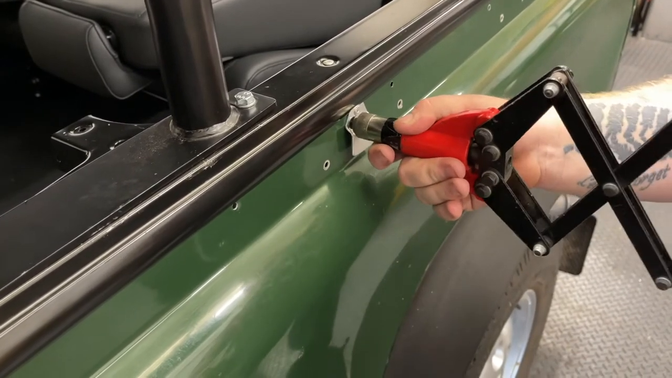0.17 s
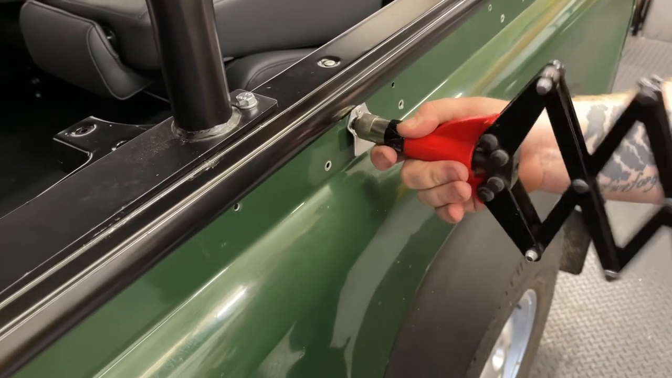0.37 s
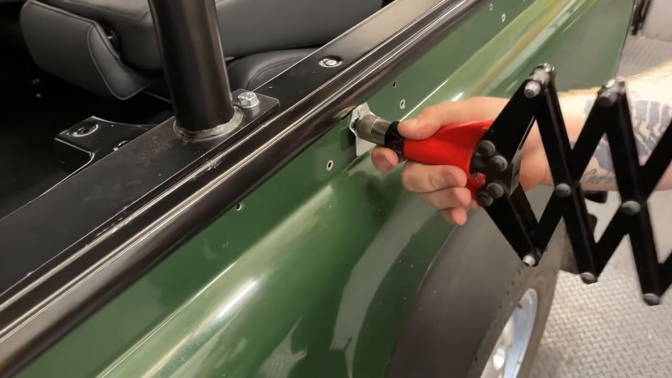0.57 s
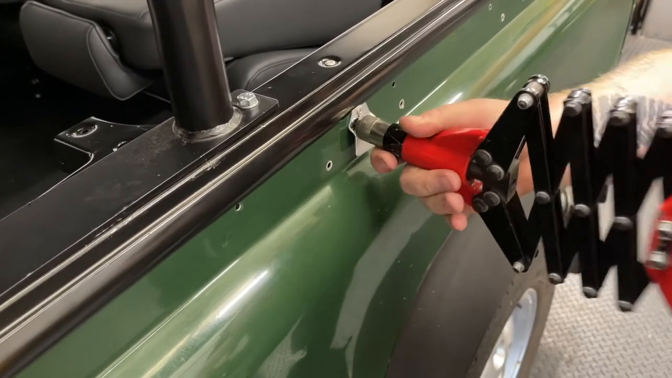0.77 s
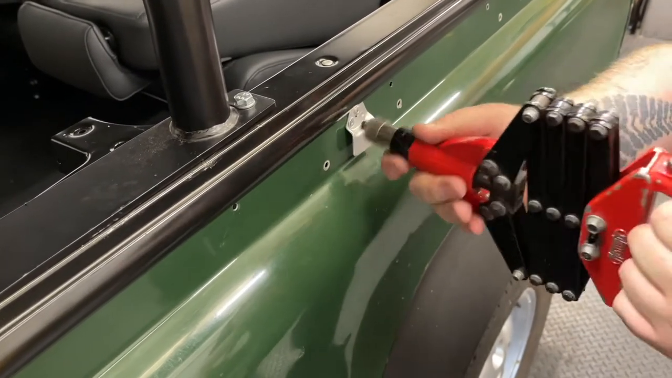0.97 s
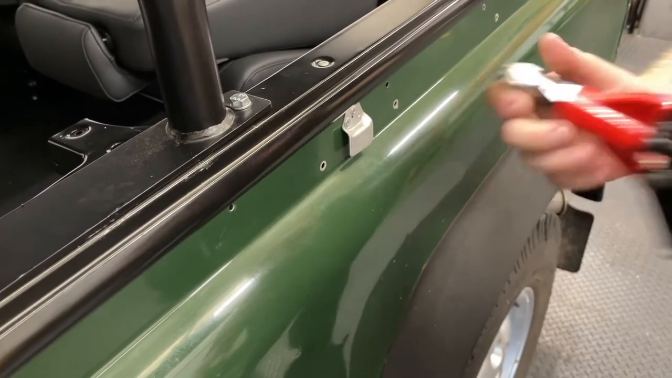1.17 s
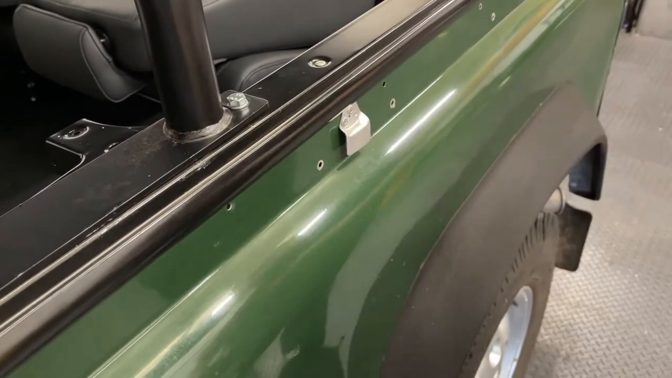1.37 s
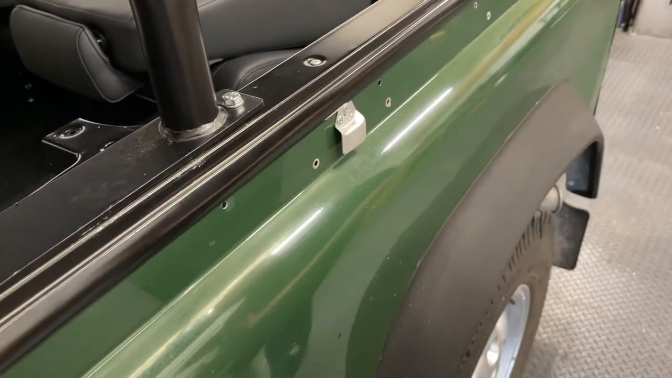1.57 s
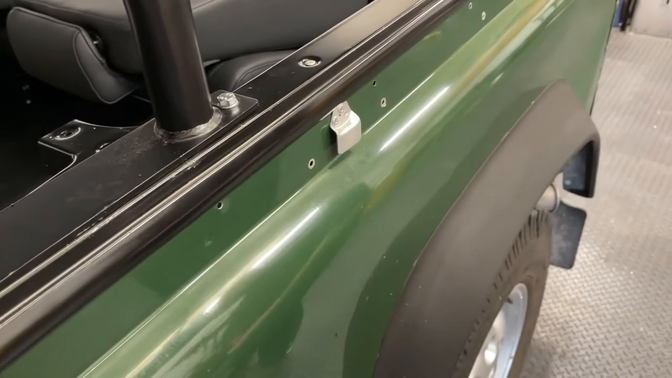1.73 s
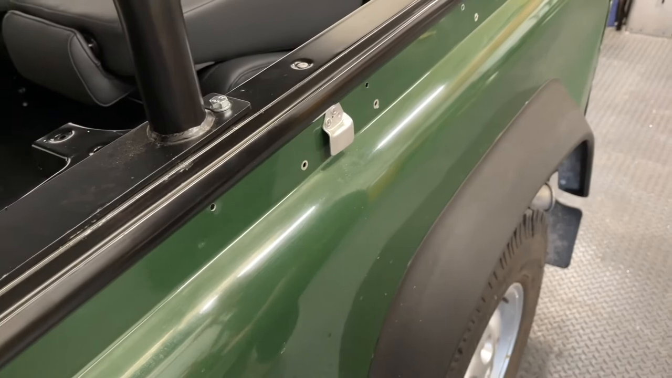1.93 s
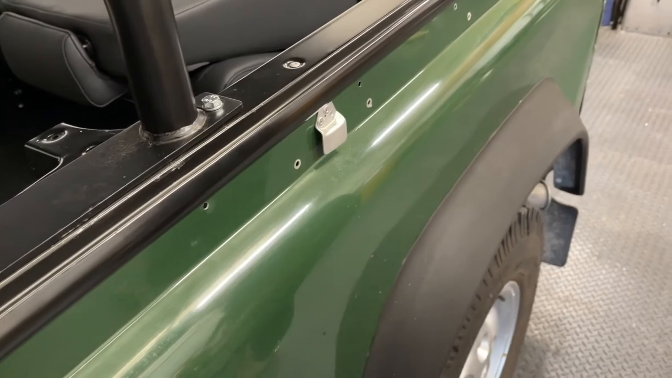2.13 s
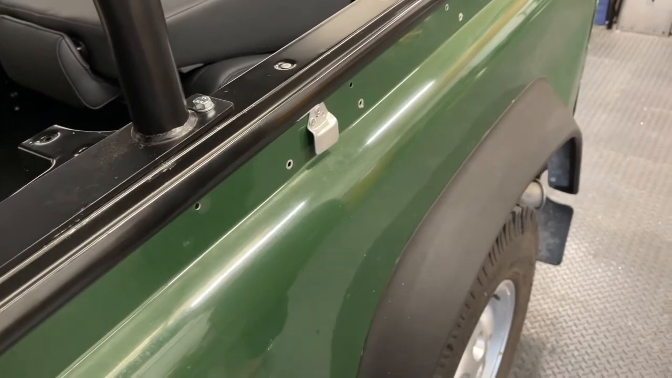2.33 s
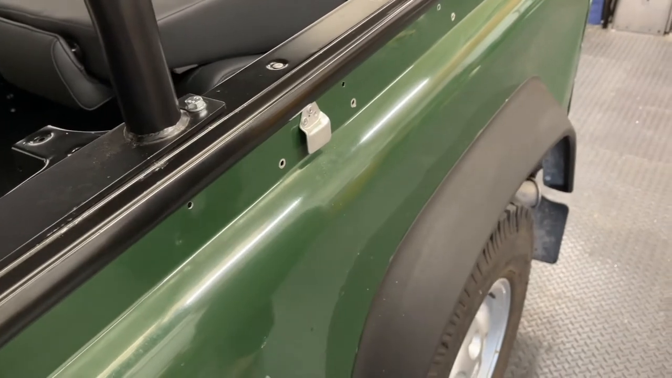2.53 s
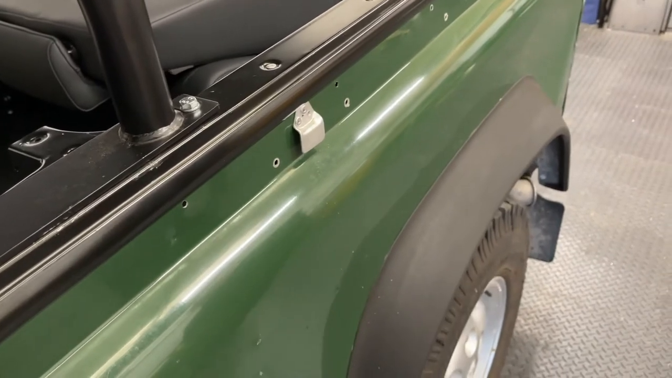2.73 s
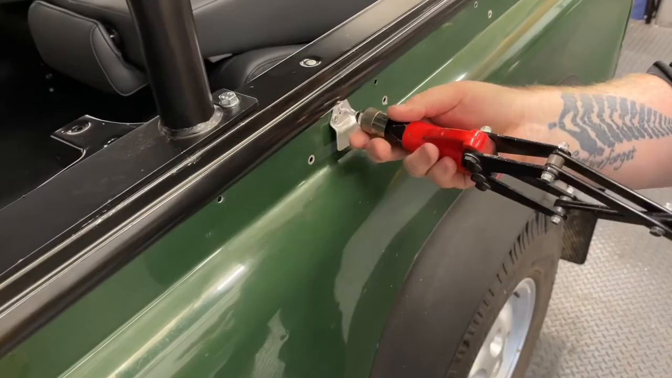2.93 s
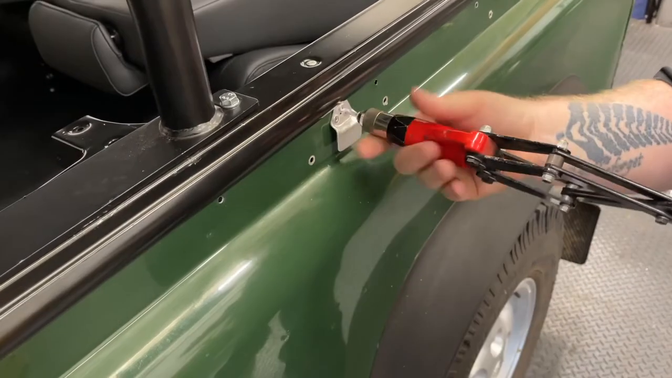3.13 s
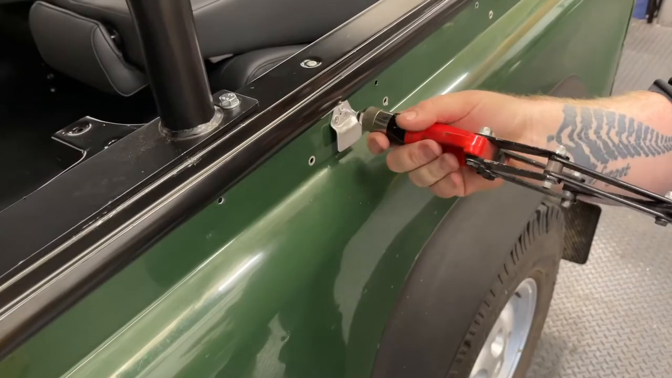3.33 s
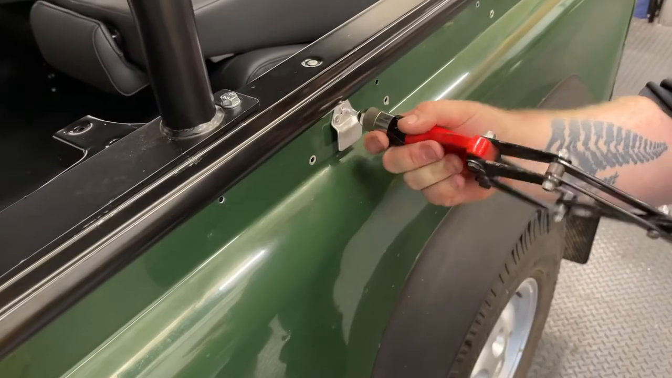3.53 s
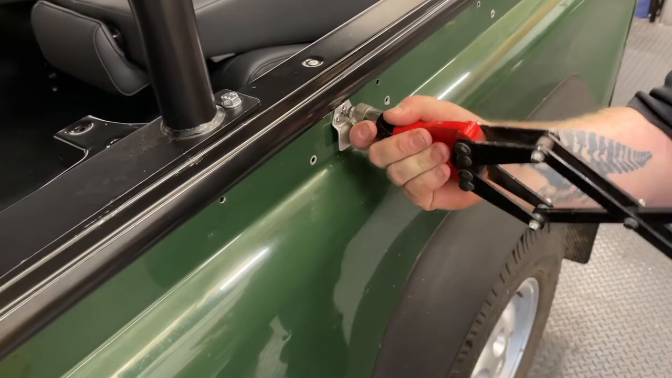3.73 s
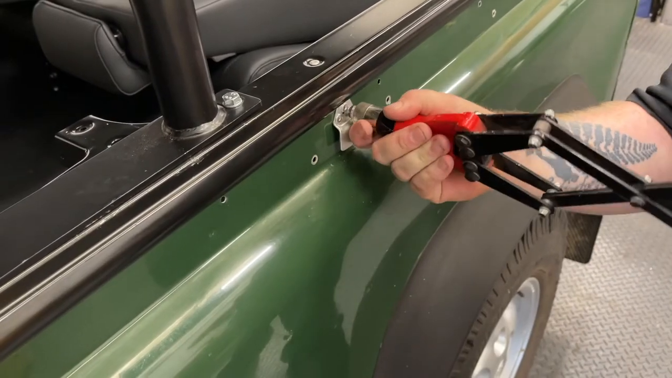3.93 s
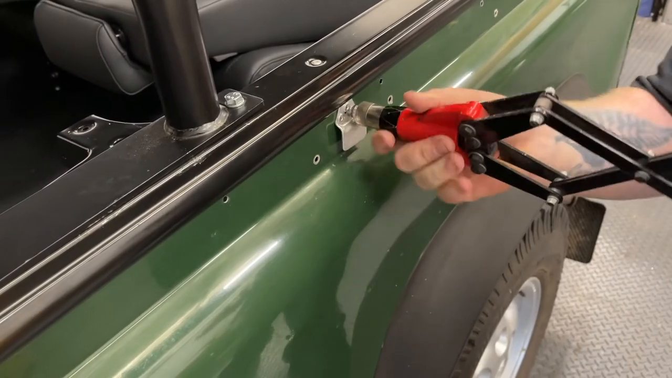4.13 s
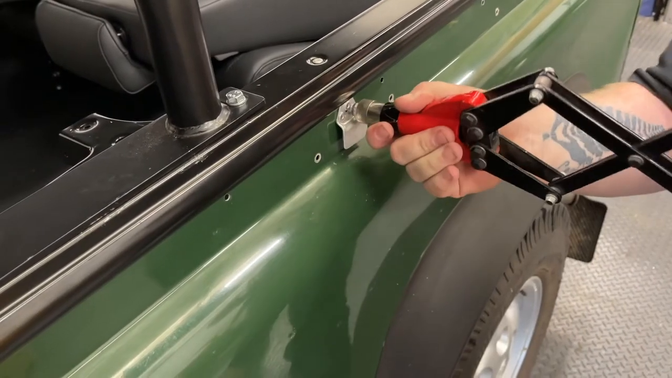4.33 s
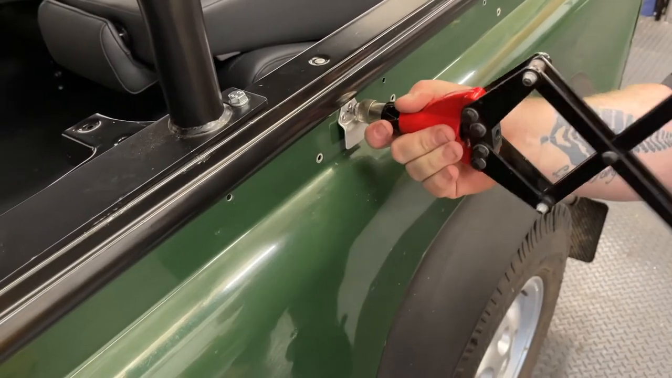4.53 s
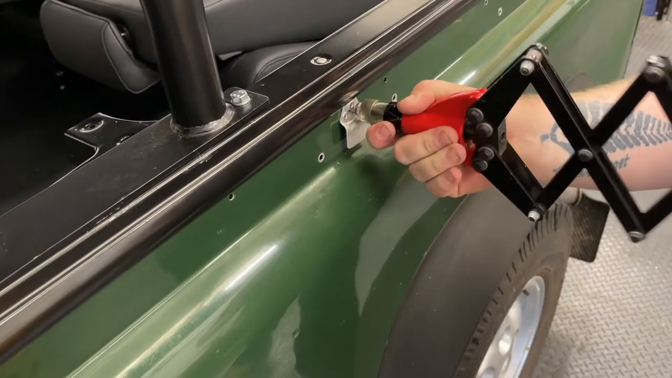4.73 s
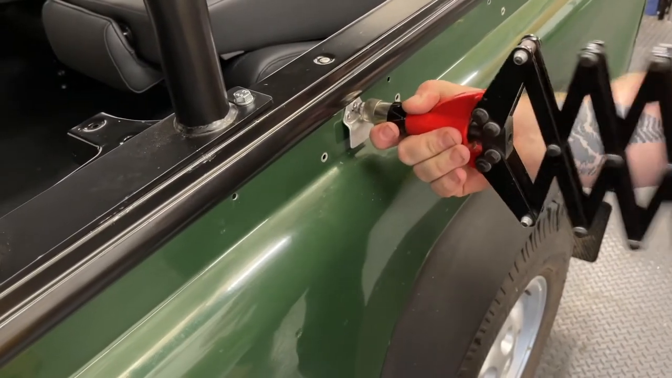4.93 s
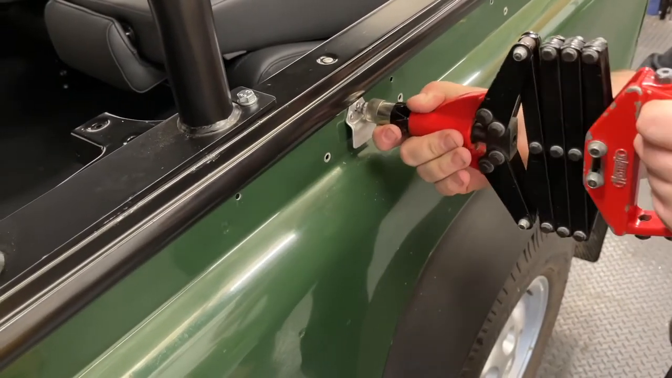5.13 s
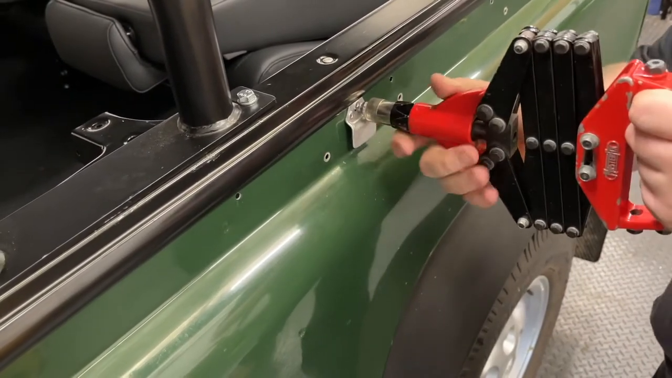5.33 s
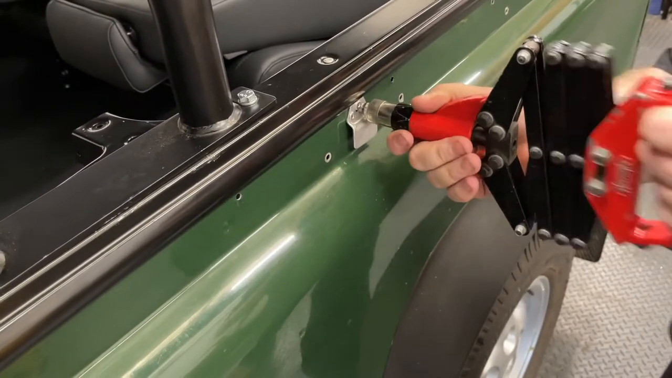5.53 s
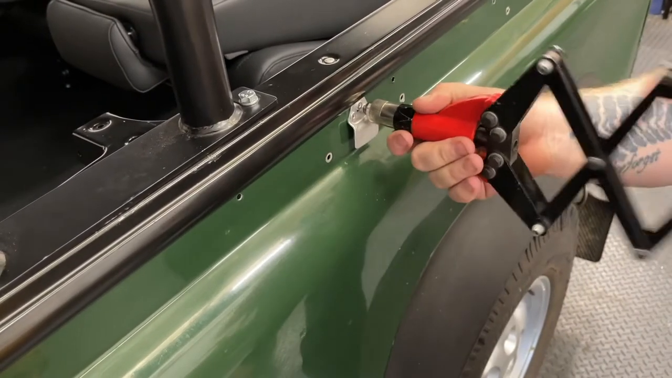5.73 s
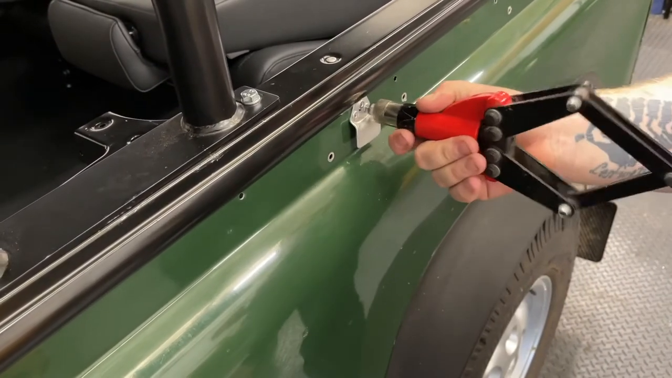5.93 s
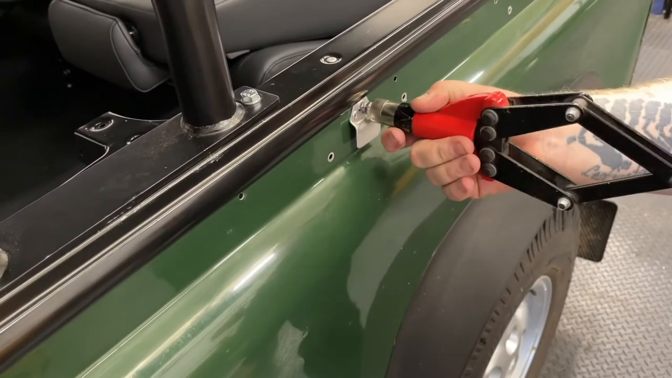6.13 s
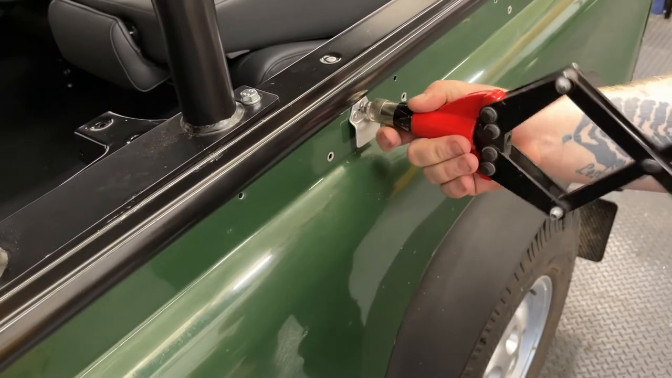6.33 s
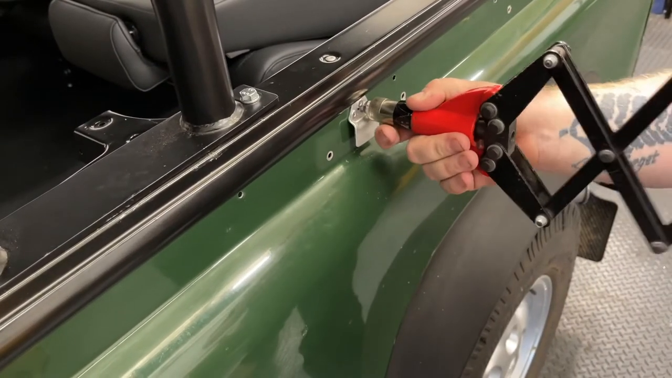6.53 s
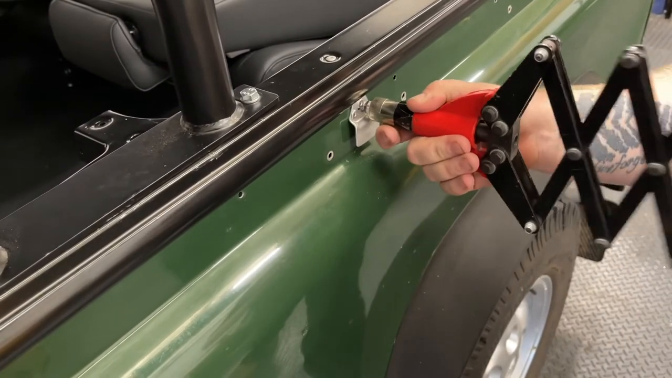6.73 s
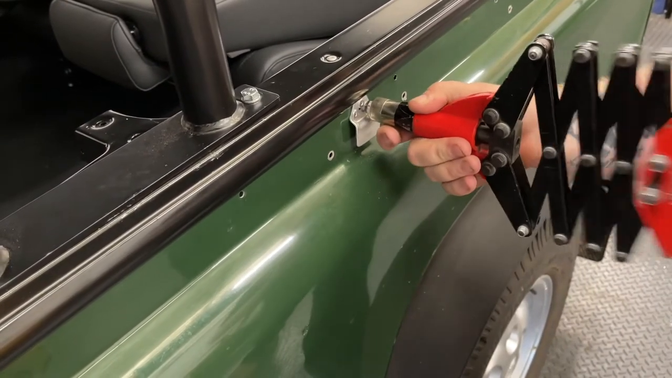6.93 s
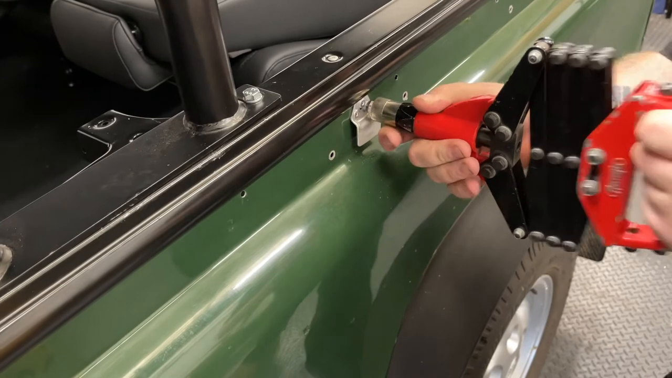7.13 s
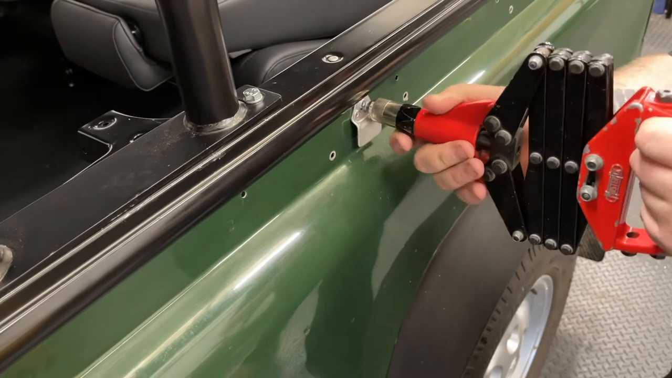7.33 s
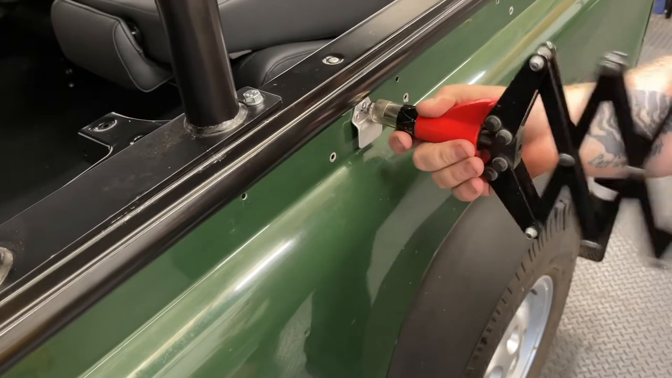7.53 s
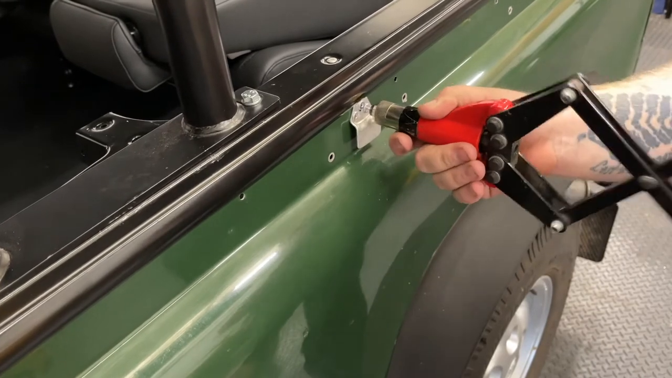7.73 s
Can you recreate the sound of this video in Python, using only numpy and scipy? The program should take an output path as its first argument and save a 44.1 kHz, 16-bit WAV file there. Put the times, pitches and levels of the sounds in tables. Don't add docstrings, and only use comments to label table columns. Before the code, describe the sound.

A low room hum with faint hiss runs throughout, in a hard workshop with short echoes. At 0.24 s a steel clack and low body boom strike with a scrape, then at 0.85 s a bright dry snap. From 1.1 to 2.8 s it is quiet: light ticks, dull bumps around 1.7 and 2.2 s, soft rubbing. A very brief dropout at 2.85 s leads to a low thump and small handling clicks. At 3.67 s comes the loudest slam, hard metal with a deep panel thud. Small ticks and panel flexing follow around 4.3-4.7 s. Clacks hit at 5.06, 5.1 and 5.2 s; rattling links and rubbing build to a double stroke at 5.9-5.95 s. Lighter clicks at 6.2-6.4 s, then strokes at 7.0 and 7.13 s, ending in groaning joints, rubbing, rattles and knocks to 7.9 s. The close stereo microphone dips slightly on blows.

```python
import sys
import numpy as np
from scipy import signal
from scipy.fft import rfft, irfft, next_fast_len
from scipy.io import wavfile
from scipy.ndimage import uniform_filter1d

SR = 44100
rng = np.random.default_rng(int(sys.argv[2]) if len(sys.argv) > 2 else 0)


def generate_wav(sig):
    pcm = np.round(np.clip(np.atleast_2d(sig).T, -1, 1) * 32767).astype(np.int16)
    wavfile.write(sys.argv[1], SR, pcm)


def gain_from_db(level_db):
    decades = np.asarray(level_db, float) / 20
    return 10 ** decades


N = 347949


def unit(x):
    return x / np.sqrt(np.mean(x ** 2) + 1e-24)


def at_hz(points, hz):
    known_hz, values = np.array(points)[:, 0], np.array(points)[:, 1]
    return np.interp(np.log(hz), np.log(known_hz), values)


def band(x, low_hz, high_hz):
    limits = [low_hz, min(high_hz, .45 * SR)]
    return signal.sosfilt(signal.butter(2, limits, "band", fs=SR, output="sos"), x)


def ring(x, hz, t60):
    r = gain_from_db(-60 / (max(t60, .002) * SR))
    w = 2 * np.pi * hz / SR
    return signal.lfilter([0, np.sin(w)], [1, -2 * r * np.cos(w), r * r], x + 1e-18)


def add(track, s, sound):
    i = round(s * SR)
    track[..., i:i + sound.shape[-1]] += sound[..., :N - i]


def grains(per_s, spread_db):
    sizes = gain_from_db(spread_db * np.minimum(rng.exponential(1, N), 4)) * rng.standard_normal(N)
    return unit(sizes * (rng.random(N) < per_s / SR))


def drift(per_s):
    knots = rng.standard_normal(int(N / SR * per_s) + 2)
    return np.interp(np.arange(N) / SR * per_s, np.arange(len(knots)), knots)


# f/Hz, level/dB per Hz
AIR_COLOUR = [(18, -48), (30, -2.5), (70, 1.5), (368, -21), (450, -24), (978, -43.5), (2240, -40.5),
              (5250, -47.5), (9000, -47), (12000, -45)]


def air():
    size = next_fast_len(N)
    hz = np.maximum(np.fft.rfftfreq(size, 1 / SR), 10)
    mid, side = rfft(rng.standard_normal((2, size))) * gain_from_db(at_hz(AIR_COLOUR, hz))
    side = side * np.clip(hz / 1800, .08, 1)
    return gain_from_db(-57.5) * unit(irfft([mid + side, mid - side], size)[:, :N])


# f/Hz, t60/s
HALL_T60 = [(250, 0.46), (1000, 0.28), (1800, 0.54), (3000, 0.59), (10000, 0.48)]
# f/Hz, level/dB
HALL_COLOUR = [(200, -1.5), (400, 0), (1000, 4), (1800, 1.5), (3000, -4), (5500, 1.5), (8500, -3.5),
               (12000, -4)]


def hall(x):
    t, tail = np.arange(SR) / SR, 0
    edges = 50 * 2 ** np.arange(0, 8.1, .5)
    white = rng.standard_normal((2, 2, SR))
    for k, (low, high) in enumerate(zip(edges, edges[1:])):
        hz = np.sqrt(low * high)
        fade = gain_from_db(at_hz(HALL_COLOUR, hz) - 60 * t / at_hz(HALL_T60, hz))
        fade = fade * np.clip(t / 0.0041, 0, 1)
        tail = tail + band(white[k % 2], low, high) * fade
    tail = signal.sosfilt(signal.butter(12, 10800, fs=SR, output="sos"), tail)
    return signal.fftconvolve(x[None], tail / np.sqrt(np.sum(tail ** 2)), axes=1)[:, :N]


# t/s, weight on the body level/dB,
# sliding links level/dB, bright sheen level/dB
HANDLING = [(0.0, -65.5, -109, -109), (0.224, -61, -83, -76.5), (.27, -31.5, -31.5, -34),
            (0.681, -51, -64, -68.5), (2.24, -59, -64.5, -69.5), (3.599, -43.5, -69.5, -65.5),
            (3.931, -38, -69, -70), (4.45, -49, -52.5, -60), (4.75, -46.5, -61.5, -62),
            (5.05, -61.5, -67.5, -76.5), (5.23, -42, -69, -73), (5.56, -39.5, -62.5, -64.5),
            (5.96, -32, -43, -58), (6.45, -39, -59, -61.5), (6.969, -62.5, -67.5, -77.5),
            (7.139, -38, -67, -81.5), (7.51, -37, -64, -72), (7.89, -32.5, -45, -51)]


def handling():
    s, *levels = np.transpose(HANDLING)
    t = np.arange(N) / SR
    return [gain_from_db(np.interp(t, s, db)) for db in levels]


def soften_top(x):
    return signal.sosfilt(signal.cheby2(8, 40, 11400, fs=SR, output="sos"), x)


def rustle(slide, sheen):
    rough = grains(13000, spread_db=0.5)
    bright = sheen * gain_from_db(4 * drift(8.6)) * band(rough, 7600, 10700)
    dull = slide * gain_from_db(3.2 * drift(4.2) - 2.5) * band(rough, 1300, 5900)
    return soften_top(bright + dull)


# t/s, length/s, level/dB, f/Hz
RUBS = [(0.202, 0.36, -42.5, 1870), (0.76, 0.08, -55, 740), (0.802, 0.024, -47, 1290),
        (1.09, 0.02, -64, 2590), (1.371, 0.098, -60, 1415), (1.655, 0.04, -52, 2200),
        (1.72, .03, -55, 2200), (1.85, 0.06, -58, 2300), (2.19, 0.16, -67, 1800),
        (2.865, 0.097, -47.5, 990), (3.009, 0.054, -52.5, 824), (3.202, 0.039, -49.5, 1494),
        (3.188, .03, -56, 1203), (3.655, 0.075, -23, 927), (3.629, 0.049, -47, 900), (3.45, .02, -62, 1700),
        (3.57, .04, -58, 1900), (4.177, 0.04, -53.5, 2660), (4.275, 0.073, -48, 1990),
        (4.434, 0.16, -63, 1180), (5.84, 0.2, -29.5, 1500), (6.165, 0.035, -50, 1212),
        (6.217, 0.088, -47, 1520), (6.307, 0.075, -40, 1530), (7.49, 0.075, -47, 1270),
        (7.612, 0.028, -47, 2240), (7.725, 0.4, -36.5, 980)]
RUB_OCTAVES = 1.7
# t/s, length/s, level/dB
SLIDES = [
    (0.208, 0.36, -45.5),
    (0.795, 0.038, -60),
    (1.855, 0.061, -63),
    (2.2, 0.078, -57.5),
    (2.477, 0.1155, -69),
    (2.739, 0.12, -58.5),
    (3.028, 0.027, -54),
]
SLIDE_HZ, SLIDE_OCTAVES = 8100, 1
# t/s, length/s, level/dB, f/Hz
SQUEAKS = [
    (.205, 0.054, -52, 7800),
    (0.209, .028, -59.5, 6900),
    (0.25, .03, -51.5, 1600),
    (3.407, .15, -64.5, 410),
    (4.288, .065, -51, 1880),
    (4.94, .11, -74, 1220),
    (5.37, .04, -60, 1200),
    (6.59, 0.15, -71, 1170),
    (6.7, 0.2, -75, 1210),
]
SQUEAK_OCTAVES = 0.08


def scuff_rows():
    return ([(*row, RUB_OCTAVES) for row in RUBS]
            + [(*row, SLIDE_HZ, SLIDE_OCTAVES) for row in SLIDES]
            + [(*row, SQUEAK_OCTAVES) for row in SQUEAKS])


def scuffs():
    out = np.zeros((2, N))
    friction = np.array([grains(2500, spread_db=1.5), grains(2500, spread_db=1.5)])
    friction = friction + 0.1 * friction[::-1]
    for s, length, db, hz, octaves in scuff_rows():
        i, size = round(s * SR), round(length * SR)
        piece = band(friction[:, i:i + size], hz * 2 ** (-octaves / 2), hz * 2 ** (octaves / 2))
        swell = np.sin(np.pi * np.arange(size) / size)[:piece.shape[1]] ** .7
        add(out, s, gain_from_db(db) * unit(piece) * swell)
    return out


# t/s, length/s, level/dB, start f/Hz, end f/Hz
GROANS = [(.765, .03, -51, 650, 900), (0.792, 0.046, -46, 856, 1463), (0.81, .03, -52, 1800, 2610),
          (5.048, .016, -52.5, 890, 943), (3.638, 0.028, -41, 900, 920), (5.496, 0.049, -62, 926, 1516),
          (5.596, 0.077, -51, 895, 1297), (5.681, .05, -57, 796, 970), (5.755, 0.063, -56.5, 700, 1318),
          (7.471, 0.055, -50.5, 700, 1310), (7.535, .06, -46, 900, 750), (7.602, 0.046, -48.5, 1109, 797),
          (7.739, .15, -42.5, 900, 1283), (2.605, 0.025, -63, 700, 1086), (3.325, 0.011, -53, 2760, 2380),
          (3.322, 0.021, -55, 1495, 1500), (3.328, 0.02, -60, 2295, 2020),
          (3.025, 0.019, -59.5, 1390, 1380), (2.9, 0.039, -60, 1920, 1602), (2.922, 0.04, -49, 700, 641),
          (6.204, 0.039, -48.5, 1690, 1506)]


def groans():
    out = np.zeros(N)
    slips = band(grains(1500, spread_db=0.5), 24, 490)
    for s, length, db, from_hz, to_hz in GROANS:
        i, along = round(s * SR), np.linspace(0, 1, round(length * SR))
        glide = np.cos(2 * np.pi * np.cumsum(from_hz + (to_hz - from_hz) * along) / SR)
        piece = slips[i:i + len(along)]
        swell = np.sin(np.pi * along[:len(piece)]) ** .7
        add(out, s, gain_from_db(db) * unit(piece * glide[:len(piece)]) * swell)
    return out


# t/s, peak level/dB, favoured f/Hz
PUSHES = [(0.019, -40.5, 61.2), (0.236, -12.5, 172), (0.262, -16.5, 72.5), (0.518, -30.5, 71.9),
          (1.662, -31.5, 228), (1.743, -42.5, 235), (1.86, -39, 59.2), (2.184, -36.5, 215),
          (2.911, -19.5, 69.3), (3.242, -32.5, 102), (3.672, -7, 228), (3.683, -4.5, 180), (3.72, -9, 76.4),
          (4.281, -32.5, 211), (4.467, -35, 147.5), (4.515, -35.5, 140), (4.545, -36, 130),
          (5.06, -24, 178.4), (5.1, -15.5, 75.4), (5.199, -6, 195.7), (5.224, -18, 73.2),
          (5.416, -32, 169.3), (5.864, -12.5, 196), (5.908, -20, 83.2), (5.948, -10, 175), (5.99, -18, 74),
          (6.337, -29.5, 178.2), (6.387, -22.5, 75.4), (6.982, -19, 170), (7.012, -13.5, 71.4),
          (7.128, -5, 172), (7.753, -18.5, 160.2), (7.836, -21.5, 75.4)]
# f/Hz, level/dB, t60/s
BODY = [(55, -2, 0.32), (69.2, -15.5, 1), (75.4, -2.5, 0.59), (82.3, -8, 0.45), (91.7, -5, 0.2),
        (129, -17, 0.61), (147.5, -4, 0.21), (172, -2.5, 0.22), (198.6, -2.5, 0.14), (228, -10, 0.1)]


def pushes(sway):
    out = np.zeros(N)
    shaking = sway * rng.standard_normal(N)
    luck = rng.standard_normal((len(PUSHES), len(BODY)))
    for k, (hz, level_db, t60) in enumerate(BODY):
        force = shaking / np.sqrt(t60 * SR)
        for (s, db, spot_hz), own in zip(PUSHES, luck[:, k]):
            off_pitch = abs(np.log2(hz / spot_hz))
            force[round(s * SR)] += gain_from_db(db - 5.5 - 5.9 * off_pitch + 2.9 * own) * (-1) ** k
        out += gain_from_db(level_db) * ring(force, hz, t60)
    return band(band(out, 40, 900), 46, 600)


# t/s, peak level/dB, favoured f/Hz
BUMPS = [(1.224, -44, 303), (1.28, -47.5, 283), (1.399, -49, 257), (1.662, -25.5, 304), (1.738, -26, 293),
         (2.184, -34, 226), (2.211, -33, 324), (2.263, -42.5, 240), (2.376, -41, 312), (2.396, -36.5, 295),
         (2.526, -43, 290), (2.742, -39, 533), (2.772, -50, 800)]
# t/s, peak level/dB, favoured f/Hz
FLEXES = [(0.592, -43, 387), (4.282, -27.5, 288), (4.371, -33.5, 252), (4.4, -30, 294.7), (4.51, -41, 373),
          (4.655, -34, 321), (4.7016, -22.5, 401), (5.527, -42.5, 252.2), (5.631, -42, 256.4),
          (7.477, -39, 330), (7.619, -40, 403), (7.761, -24, 253)]


def pops():
    out, t = np.zeros(N), np.arange(2048) / SR
    fall, fall_s, cycles = 1.1, .002, .8
    for s, db, hz in BUMPS + FLEXES:
        turns = hz * (t + fall * fall_s * (1 - np.exp(-t / fall_s)))
        swell = t * hz / cycles
        add(out, s, gain_from_db(db - 1.5) * swell * np.exp(1 - swell) * np.sin(2 * np.pi * turns))
    return out


# t/s, peak level/dB, favoured f/Hz, hardness level/dB
RAPS = [(.521, -29.5, 780, -10), (.857, -42.5, 1440, -14.5), (3.21, -40.5, 600, -7),
        (5.062, -20.5, 765, -11), (5.1, -17, 660, -8), (5.199, -21.5, 1083, 4), (5.203, -6, 970, -16.5),
        (5.674, -37, 587, -12), (5.74, -35, 802, -4), (5.853, -34, 680, -3), (5.865, -28.5, 720, 3),
        (5.906, -17.5, 577, 0), (5.947, -9.5, 700, -10), (6.214, -42.5, 750, 6), (6.339, -25.5, 669, -5),
        (6.971, -23, 717, -4), (7.018, -14.5, 596, -13), (7.499, -34, 700, -8.5), (7.547, -40, 820, 5.5),
        (7.738, -26, 690, -6.5), (7.821, -27.5, 525, 0), (7.86, -24.5, 441.7, -5),
        (7.881, -22, 598.7, -9.5)]
# t/s, peak level/dB, favoured f/Hz, thud t60/s, hardness level/dB
SLAMS = [
    (0.2359, -19, 354.5, 0.056, -3),
    (0.236, -16, 1600, 0.13, -0.5),
    (3.669, 0, 1840, 0.086, -6),
    (3.673, -7, 331, 0.079, -10.5),
    (3.685, -3.5, 620, 0.072, -21.5),
    (7.13, -8, 1035, 0.062, -6),
    (7.138, -15.5, 355, 0.11, -13.5),
    (5.208, -10.5, 337, 0.078, -19),
    (5.949, -11, 293, 0.062, -12),
]


def knock_rows():
    noise_db = -8
    return ([(s, db + noise_db, hz, 0.075, -15) for s, db, hz in BUMPS]
            + [(s, db + noise_db, hz, 0.085, -10) for s, db, hz in FLEXES]
            + [(s, db, hz, .06, hard_db) for s, db, hz, hard_db in RAPS] + SLAMS)


def thuds():
    out, t = np.zeros((2, N)), np.arange(6144) / SR
    noise = rng.standard_normal((len(knock_rows()), 3, len(t)))
    for (s, db, hz, t60, hard_db), (mid, side, edge) in zip(knock_rows(), noise):
        fade = gain_from_db(-60 * t / max(t60, .005))
        mid = mid + 7.1 * (t == 0)
        lump = band((mid + 1.1 * side * [[1], [-1]]) * fade, hz / 1.43, hz * 1.25)
        lump = lump + gain_from_db(hard_db - 6.0) * band(edge * fade, hz, hz * 4.7)
        add(out, s, gain_from_db(db + 3.0) * lump / np.abs(lump).max())
    return out


# f/Hz, level/dB, t60/s
PANEL = [(291, 1, 0.17), (355, -1, 0.18), (414, -4, 0.14), (500, 4.5, 0.012), (650, 1.5, 0.1),
         (700, -1.5, 0.064), (764.8, -9, 0.19), (854.6, -3.5, 0.18), (930, -10, 0.088), (1150, -8, 0.068),
         (1345, -10, 0.12), (1423, -6.5, 0.089), (1740, -16, 0.072), (1538, -12.5, 0.059)]


def sheet(rub):
    out, t, hits = np.zeros((2, N)), np.arange(1024) / SR, knock_rows()
    rough = rng.standard_normal((len(PANEL), len(hits), len(t))) * np.exp(-t / 0.021)
    rough = rough / np.sqrt(np.sum(rough ** 2, axis=2, keepdims=True))
    friction = rub * rng.standard_normal(N)
    for (hz, level_db, t60), bursts in zip(PANEL, rough):
        force = friction / np.sqrt(t60 * SR)
        for (s, db, spot_hz, _, hard_db), burst in zip(hits, bursts):
            off_pitch = abs(np.log2(hz / spot_hz))
            add(force, s, burst * gain_from_db(db + hard_db + 5.5 - 9.3 * off_pitch))
        patch = gain_from_db(1.3 * rng.standard_normal((2, 1)))
        out += gain_from_db(level_db) * ring(force, hz, 0.46 * t60) * patch
    return out


# t/s, peak level/dB, ring f/Hz, t60/s
SNAPS = [(.2352, -8.5, 8060, 0.028), (.2375, -15, 2060, 0.066), (.838, -15.5, 8750, 0.012),
         (.8455, -20, 8700, 0.017), (.8592, -5, 9200, 0.013), (.86, -14, 5100, 0.039),
         (.862, -20, 2796, 0.03), (3.668, -6.5, 2000, 0.081), (3.671, -20, 8200, 0.0087),
         (3.675, -11, 2340, 0.072), (3.6858, -16, 4370, .015), (5.0608, -18, 9100, 0.019),
         (5.0995, -16, 9590, 0.03), (5.1984, -7, 8950, 0.0079), (5.2076, -16, 9100, 0.0075),
         (5.9319, -19, 7300, 0.056), (5.9462, -7, 3375, 0.034), (5.9465, -22.5, 11100, 0.15),
         (.863, -28, 10970, 0.15), (5.922, -31.5, 11200, 0.07), (5.948, -4.5, 1720, 0.079),
         (6.97, -16, 9600, 0.0031), (7.0135, -16.5, 9350, 0.016), (7.1285, -4.5, 9500, 0.0079)]
# t/s, peak level/dB
PINS = [(0.2253, -48.5), (1.0957, -39), (1.2145, -42), (1.4269, -40.5), (1.437, -37), (1.6882, -38.5),
        (1.727, -45), (1.778, -46), (2.0897, -51), (2.22, -47), (2.778, -49), (3.032, -40), (3.2136, -37.5),
        (4.1609, -44.5), (4.2769, -41), (5.2502, -39), (5.576, -47), (5.676, -40), (5.761, -29),
        (5.8278, -33.5), (6.2359, -29.5), (7.697, -42)]
PIN_HZ, PIN_T60_S = 9100, 0.0054
# t/s, peak level/dB
CLACKS = [(3.2218, -46), (3.571, -52), (3.9492, -45.5), (5.583, -48.5), (5.62, -34), (5.8693, -25.5),
          (5.905, -34), (5.9166, -22.5), (6.2123, -33.5), (6.417, -40), (7.4972, -39), (7.5435, -39),
          (7.789, -42), (7.804, -56), (7.869, -35), (7.8824, -23.5)]
CLACK_HZ, CLACK_T60_S = 2200, 0.02
# t/s, peak level/dB, ring f/Hz
LINKS = [(0.725, -54, 3600), (0.736, -65, 8000), (4.11, -61, 5900), (5.594, -48, 3900), (7.475, -49, 3000),
         (7.711, -45, 7500), (7.724, -46, 8000), (7.624, -52, 3800), (0.8332, -31, 2840),
         (1.303, -49.5, 6130), (1.351, -43, 4000), (1.6577, -47, 3040), (1.6738, -44.5, 4200),
         (3.51, -51, 6350), (3.531, -59, 6720), (3.555, -60.5, 2807), (3.583, -58.5, 3500),
         (3.5903, -54, 3920), (4.0118, -46, 2730), (4.178, -42, 4820), (4.289, -32, 2850),
         (4.43, -55.5, 4000), (4.44, -47.5, 3290), (4.445, -51.5, 8600), (7.433, -51.5, 3260),
         (1.092, -48, 8000), (1.105, -55, 2200), (4.6677, -50, 7030), (5.4105, -44, 2770),
         (5.7333, -28, 6400), (5.8504, -32, 3040), (6.2614, -37, 4550), (6.333, -30, 3640),
         (6.3384, -26, 3670), (7.4258, -41.5, 3100), (7.464, -48, 3270), (7.5353, -47.5, 3000),
         (7.583, -38.5, 6360), (7.617, -45, 3400), (7.7337, -33.5, 4800), (7.759, -32.5, 3280),
         (7.8198, -34, 4560), (7.753, -35, 4500), (7.852, -38, 3200), (7.70, -46, 2500)]
LINK_T60_S = 0.0088


def tick_rows():
    return (SNAPS + [(*row, PIN_HZ, PIN_T60_S) for row in PINS]
            + [(*row, CLACK_HZ, CLACK_T60_S) for row in CLACKS]
            + [(*row, LINK_T60_S) for row in LINKS])


def ticks():
    out, t = np.zeros((2, N)), np.arange(4096) / SR
    noise = rng.standard_normal((len(tick_rows()), 3, len(t)))
    rattles = band(noise[:, 1, ::-1], 2200, 11800) * gain_from_db(-60 * t / 0.17)
    glints = gain_from_db(11) * band(noise[:, 0] * gain_from_db(-60 * t / .007), 12500, 16500)
    for (s, db, hz, t60), (a, b, side), rattle, glint in zip(tick_rows(), noise, rattles, glints):
        crack = band((a + 2.5 * (t == 0)) * gain_from_db(-60 * t / 0.014), 1800, hz + 3500)
        fade = gain_from_db(-60 * t / max(t60, .003))
        link = band((b + .5 * side * [[1], [-1]]) * fade, hz - 900, hz + 900)
        tick = gain_from_db(-3) * crack + gain_from_db(3) * link + gain_from_db(-24) * rattle
        peak = np.abs(tick).max()
        if 8400 < hz < 10000:
            tick = tick + glint
        add(out, s, gain_from_db(db + 7.0) * tick / peak)
    return out


# t/s, level/dB
BITES = [(3.03, -40.5), (5.0615, -17.5), (5.068, -26.5), (5.1005, -13), (5.11, -27), (5.868, -29.5),
         (5.906, -16.5), (5.916, -17), (5.926, -11.5), (6.176, -49), (6.338, -26), (6.358, -26),
         (6.422, -36.5), (6.555, -49.5), (6.615, -47.5), (6.971, -18), (6.98, -18), (7.0145, -22),
         (7.022, -16), (7.79, -31.5), (7.804, -28), (7.835, -28.5), (7.87, -25)]
# f/Hz, level/dB, t60/s
JAW_MODES = [(625, 1, .05), (840, 1, .04), (740, -3, .03), (960, -5, .025), (1420, -22, .04),
             (2300, -16, .025)]
# t/s, level/dB
STOPS = [
    (3.687, -12),
    (5.199, -8.5),
    (5.207, -27),
    (5.958, -18),
    (7.129, -20),
    (7.138, -25),
    (7.736, -31),
    (7.761, -28),
    (7.876, -24),
    (7.885, -18.5),
]
# f/Hz, level/dB, t60/s
STOP_MODES = [(985, -9, .2), (921, -19, .25), (880, 0, .035), (600, -7, .045), (781, -8, .045),
              (1168, -7, .09), (1418, -8, .06), (2295, -10, .02), (2735, -12, .02)]


def tool():
    out, contact_s = np.zeros(N), 0.013
    for hits, modes in ((BITES, JAW_MODES), (STOPS, STOP_MODES)):
        luck = rng.standard_normal((len(hits), len(modes)))
        for k, (hz, level_db, t60) in enumerate(modes):
            force = np.zeros(N)
            for (s, db), own in zip(hits, luck[:, k]):
                force[round(s * SR)] = gain_from_db(db + level_db + 1.4 * own) * (-1) ** k
            out += ring(force, hz, t60) - ring(force, hz, contact_s)
    return out


def scene():
    sway, slide, sheen = handling()
    links = rustle(slide, sheen) + ticks()
    rub = sway * gain_from_db(-13.5)
    panel = thuds() + sheet(rub) + soften_top(scuffs())
    body = pushes(sway)
    panel = panel + tool() + groans() + pops()
    sent = gain_from_db(-17.0) * links.mean(axis=0) + gain_from_db(-7.5) * panel.mean(axis=0) + gain_from_db(-3.5) * body
    return links + panel + body + hall(sent) + air()


# f/Hz, level/dB
MICROPHONE = [(20, -17.5), (50, 2), (6500, -4.5), (9800, 7), (11000, 12.5), (11900, -8), (13000, -24),
              (15800, -32), (16800, -66.5)]
# f/Hz, phase/rad
PORT_PHASE = [(0, 0), (1030, .6), (1380, .4), (1750, 1.7), (2150, .4), (3100, 1.1), (5000, 1.2), (6630, .5),
              (7750, 1), (8620, 0), (9600, -2.3), (10200, -3.14), (10900, -4), (11600, -6), (12300, -6.4),
              (13000, -7), (15600, -13)]
# f/Hz, level/dB
PORT_BALANCE = [(150, -1.5), (300, -1.5), (700, 3), (2000, 1.5), (5000, 3), (7500, 4), (8500, 0)]
# f/Hz, share/0-1
PORT_WIDTH = [(60, .08), (300, 0.5), (1500, 1), (5000, .5), (7600, 0.5), (8400, .03)]


def ports(x):
    size = next_fast_len(N + 4096)
    hz = np.maximum(np.fft.rfftfreq(size, 1 / SR), 10)
    left, right = rfft(x, size) * gain_from_db(at_hz(MICROPHONE, hz))
    mid, side = (left + right) / 2, (left - right) / 2 * at_hz(PORT_WIDTH, hz)
    tilt = gain_from_db(at_hz(PORT_BALANCE, hz) / 2)
    turn = np.exp(-1j * np.interp(hz, *np.transpose(PORT_PHASE)))
    return irfft([(mid + side) * tilt, (mid - side) / tilt * turn], size)[:, :N]


def drop_faint(x, edge_hz, threshold_db, size):
    top = signal.sosfiltfilt(signal.cheby1(10, .05, edge_hz, "high", fs=SR, output="sos"), x)
    top_db = 10 * np.log10(uniform_filter1d(top ** 2, size=size) + 1e-14)
    return x - top * np.clip((threshold_db - top_db) / 4, 0, 1)


def low_pass(x):
    return signal.sosfilt(signal.butter(12, 17000, fs=SR, output="sos"), x)


def record(dry):
    t = np.arange(N) / SR
    level_db = 10 * np.log10(uniform_filter1d(np.max(dry ** 2, axis=0), size=128) + 1e-12)
    held_db = np.maximum.accumulate(level_db + 45 * t) - 45 * t
    duck_db = uniform_filter1d(-.3 * np.maximum(held_db + 21.5, 0), size=128)
    pause_s, resume_s = 2.851, 2.897
    running = np.clip(np.maximum(pause_s - t, t - resume_s) / 0.0041, .03, 1)
    x = ports(np.tanh(dry * gain_from_db(duck_db + 1.5))) * running
    mid = drop_faint(x.mean(axis=0), 12400, threshold_db=-66, size=192)
    mid = drop_faint(mid, 9950, threshold_db=-65, size=768)
    notch = signal.cheby2(4, 30, [10000, 10500], "bandstop", fs=SR, output="sos")
    mid = signal.sosfiltfilt(notch, mid)
    side = drop_faint((x[0] - x[1]) / 2, 11050, threshold_db=-60, size=768)
    return low_pass(np.array([mid + side, mid - side]))


dry = scene()
out = record(dry)
generate_wav(out)
```